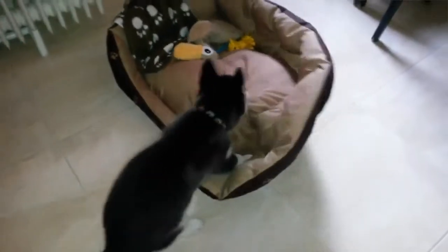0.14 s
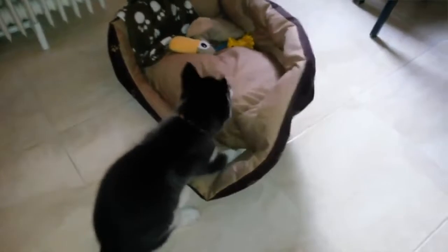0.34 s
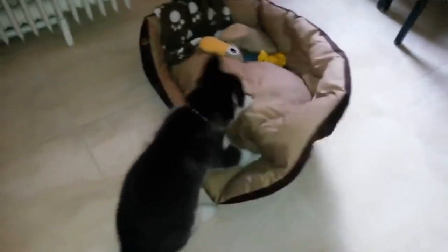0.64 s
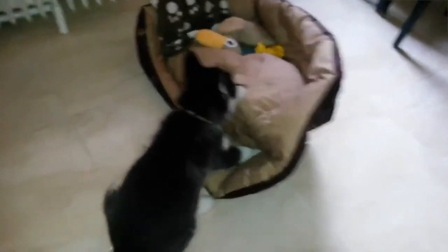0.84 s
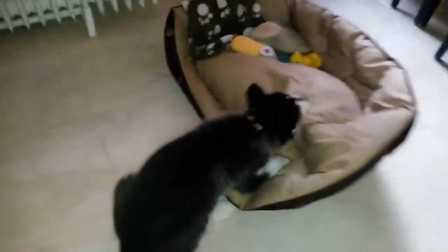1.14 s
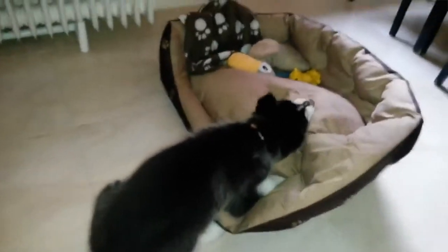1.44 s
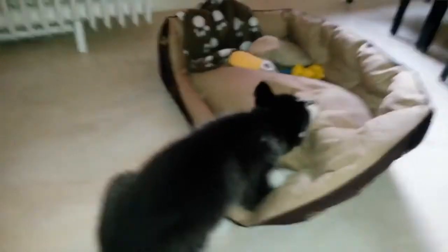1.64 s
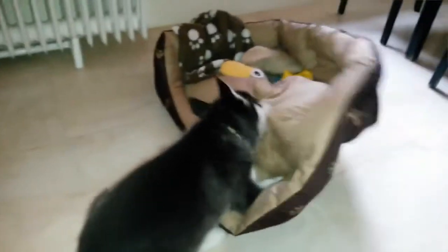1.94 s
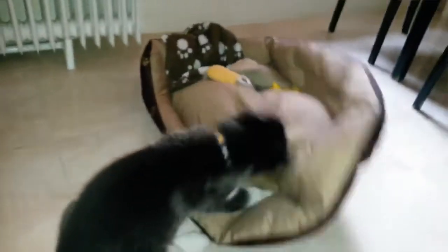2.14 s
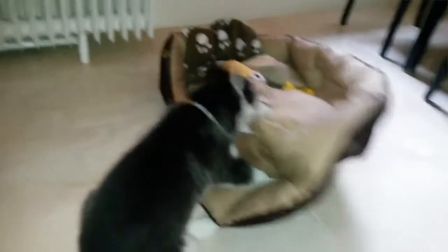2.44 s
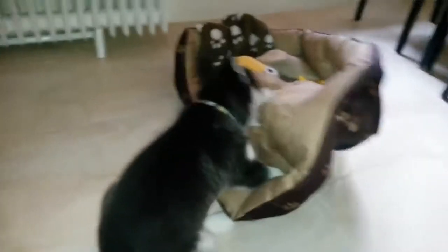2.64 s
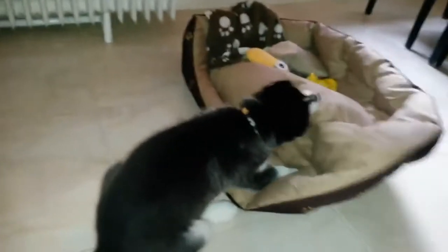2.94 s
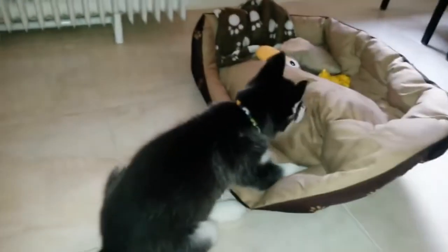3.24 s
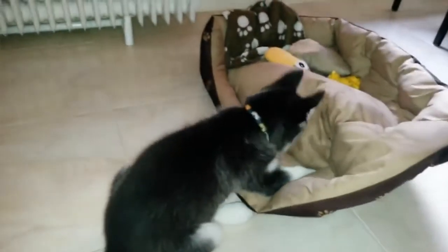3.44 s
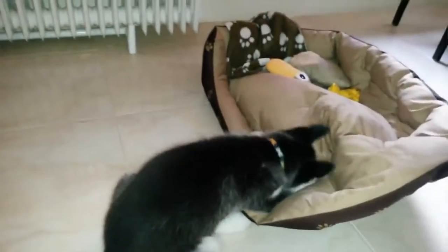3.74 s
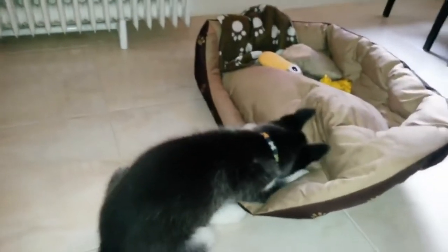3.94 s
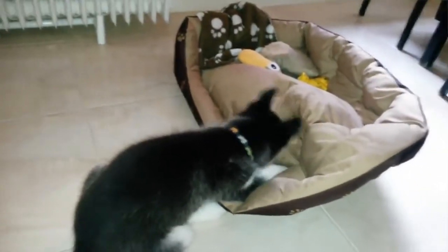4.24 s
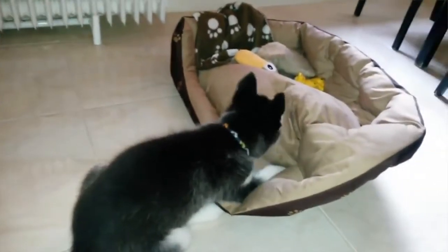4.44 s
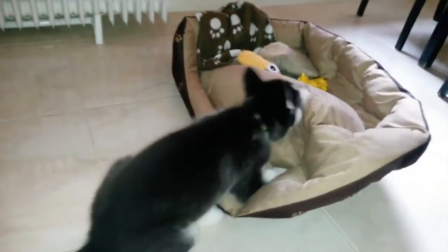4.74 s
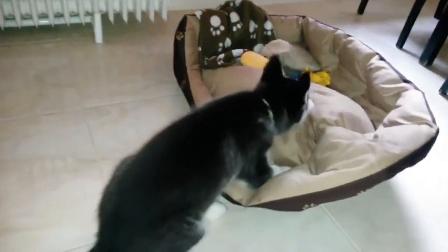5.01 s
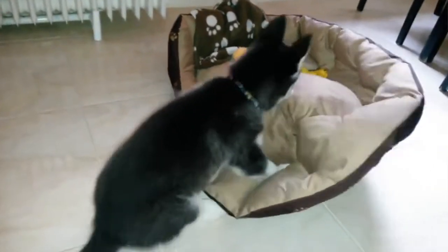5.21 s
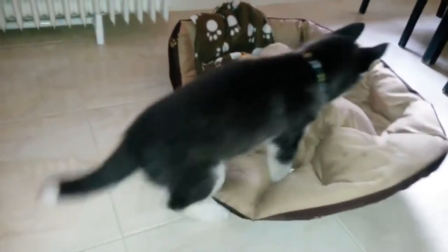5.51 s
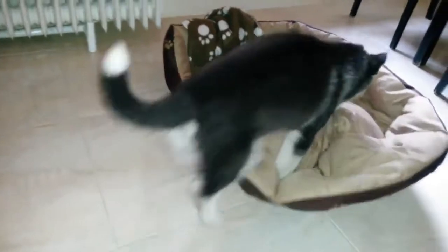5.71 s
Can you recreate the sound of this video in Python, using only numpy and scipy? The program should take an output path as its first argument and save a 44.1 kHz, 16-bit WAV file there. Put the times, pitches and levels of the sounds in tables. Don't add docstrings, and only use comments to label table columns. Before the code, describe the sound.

A puppy digs at a padded bed on tiles in a bare, ringing room, heard by a phone two metres away. Soft rustle opens, then a hard paw knock at 0.2 s with a squeeze of padding. Strokes quicken from 0.5 s, with a softer double knock at 0.6-0.7 s and a strong cloth swish around 1.1 s with a sharp claw snag on the left; a bright clip follows at 1.3 s. From 1.5 to 2.6 s the rustling is looser, with faint bumps. The base judders low at 2.65 s, and the heaviest thump lands at 3.0 s, its echo fading. A small knock at 3.24 s leads into near quiet. At 3.8-4.2 s a muffled, fluttering huff goes into the cushion over low judder, with a small bump at 4.34 s. Pawing returns from 4.8 s, a knock and judder hit at 5.23 s, and bright rustling swells to the end.

```python
import sys
import numpy as np
from scipy import signal
from scipy.fft import rfft, irfft, next_fast_len
from scipy.io import wavfile
from scipy.ndimage import uniform_filter1d

SR = 44100
rng = np.random.default_rng(int(sys.argv[2]) if len(sys.argv) > 2 else 0)


def store_pcm(level_fs):
    pcm = np.round(np.clip(level_fs, -1, 1) * 32767).astype(np.int16)
    wavfile.write(sys.argv[1], SR, np.atleast_2d(pcm).T)


def rack_gain(trim_db):
    fader = np.asarray(trim_db, float)
    return 10 ** (fader / 20)


N = 258862
SIZE = next_fast_len(N + SR)
HZ = np.maximum(np.fft.rfftfreq(SIZE, 1 / SR), 1)
T = np.arange(N) / SR
TICKS = np.arange(0, N / SR, 1 / 1000)


def unit(x):
    return x / np.sqrt(np.mean(x ** 2))


def along(table, column, hz=HZ):
    rows = np.array(table)
    return np.interp(np.log(hz), np.log(rows[:, 0]), rows[:, column])


def curve(table):
    return rack_gain(along(table, 1))


def causal(gain):
    ceps = irfft(np.log(gain + 1e-6), SIZE)
    ceps[1:SIZE // 2] *= 2
    ceps[SIZE // 2 + 1:] = 0
    return np.exp(rfft(ceps))


def ring(hz, width_hz):
    return 1 / (1 + 1j * (HZ - hz * hz / HZ) / width_hz)


def peak(response):
    return response / np.abs(irfft(response, SIZE)).max()


def through(x, response):
    return irfft(rfft(x, SIZE) * response, SIZE)[..., :N]


def pair(source, like):
    mid, side = rfft(source, SIZE)
    like = np.clip(like, 0, 1)
    mid = mid * np.sqrt((1 + like) / 2)
    side = side * np.sqrt((1 - like) / 2)
    return np.array([mid + side, mid - side])


def walk(rate_hz):
    hold = int(SR / rate_hz)
    steps = np.repeat(rng.standard_normal(N // hold + 1), hold)
    return unit(uniform_filter1d(uniform_filter1d(steps, hold), hold)[:N])


def grains(rate_hz, spread_db):
    chance, size, sign = rng.random((3, 2, N))
    size = rack_gain(-spread_db * np.log(size + 1e-4))
    return (chance < rate_hz / SR) * size * np.sign(sign - .5)


def slips(response, rate_hz, spread_db, flicker_db, flicker_hz):
    source = grains(rate_hz, spread_db) * rack_gain(flicker_db * walk(flicker_hz))
    return unit(irfft(pair(source, along(ROOM, 3)) * response, SIZE)[:, :N])


def swells(s, db, swell_s, fade_s, swell_bend=1.3, fade_bend=1.8):
    late_s = TICKS - s[:, None]
    before = (np.maximum(-late_s, 0) / np.c_[swell_s]) ** swell_bend
    after = (np.maximum(late_s, 0) / np.c_[fade_s]) ** fade_bend
    return np.sum(rack_gain(2 * (db[:, None] - 20 * (before + after))), axis=0)


def shudder(db, fade_s):
    hit_s = np.transpose(BLOWS)[0]
    return swells(hit_s + .004, db, [.003], [fade_s], 1, 1)


def level_db(power):
    return np.interp(T, TICKS, 10 * np.log10(power + rack_gain(2 * -95)))


def rubbing():
    sheen_db, rasp_db = strokes()
    scuff_db, judder_db = shoves()
    cloth = rack_gain(sheen_db + 2.5) * sheen(scuff_db - sheen_db)
    cloth = cloth + rack_gain(rasp_db + 1.5) * rasp() + rack_gain(scuff_db + 0.5) * scuff()
    cloth_pan_db = 0.4
    cloth = cloth * rack_gain(np.array([[cloth_pan_db], [-cloth_pan_db]]) / 2)
    return cloth + rack_gain(judder_db - 1.15) * judder() + shake(judder_db)


# peak t/s, level/dB, 20 dB swell/s, 20 dB fade/s, rasp re sheen/dB
STROKES = [(0, -62, .1, .5, -3), (4.3, -71, .17, .12, -5), (.47, -52, .22, .2, -5),
           (.605, -48.5, .08, .2, -6), (.68, -50, .1, .34, -5), (1.004, -48, .06, .2, -6),
           (1.1, -42.5, .16, .12, -7), (5.66, -54, .2, .3, -5), (1.22, -52, .15, .2, -6),
           (1.33, -47.5, .15, .14, -6), (1.63, -56, .22, .45, -6), (1.86, -58, .3, .4, -3),
           (2.11, -51, .3, .4, -8), (2.35, -49.5, .3, .4, -6), (2.63, -52.5, .2, .35, -6),
           (2.98, -55.5, .3, .15, -4), (3.245, -68, .02, .17, -5), (3.67, -76, .2, .3, -9),
           (3.8, -65, .1, .62, -1), (4.83, -58, .12, .45, -6), (5.02, -50, .12, .19, -7),
           (5.25, -50.5, .12, .3, -7), (5.39, -47.5, .2, .3, -6), (5.87, -43.5, .2, .2, -9)]


def strokes():
    s, db, swell_s, fade_s, rasp_db = np.transpose(STROKES)
    knock_db = np.transpose(BLOWS)[1]
    sheen_power = swells(s, db, swell_s, fade_s) + shudder(knock_db - 29.5, .25)
    rasp_power = swells(s, db + rasp_db, swell_s, fade_s) + shudder(knock_db - 25.5, .14)
    return level_db(sheen_power), level_db(rasp_power)


# peak t/s, level/dB, 20 dB swell/s, 20 dB fade/s, scuff re judder/dB
SHOVES = [(0, -57, .1, .25, -4), (.38, -56, .3, .13, -6), (.53, -60, .1, .2, 1), (.95, -63, .25, .17, -4),
          (1.154, -58, .03, .1, -4), (1.262, -56, .15, .2, -6), (1.35, -55, .15, .17, -1),
          (1.67, -60, .14, .3, -2), (1.86, -66, .3, .3, 5), (2.07, -59, .3, .4, 0), (2.33, -56, .2, .4, -1),
          (2.652, -41, .012, .07, -13), (2.71, -45, .04, .09, -12), (2.84, -62, .1, .17, -8),
          (2.96, -70, .15, .15, 6), (3.794, -68, .05, .55, 11), (4.0, -49, .15, .2, -14),
          (4.135, -50, .05, .08, -11), (4.345, -51, .01, .08, -20), (4.86, -64, .08, .6, 0),
          (4.95, -46, .1, .12, -20), (5.235, -40, .012, .05, -20), (5.42, -58.5, .3, .25, -2),
          (5.76, -61, .3, .9, 2)]
# peak t/s, level/dB, 20 dB swell/s, 20 dB fade/s
SCUFFS = [(.01, -56, .05, .05), (.2, -42, .01, .08), (.3, -58, .12, .15), (.5, -64, .15, .15),
          (.72, -54, .1, .13), (1.18, -65, .1, .12), (1.57, -69, .1, .1), (1.84, -58, .1, .13),
          (2.17, -62, .2, .15), (2.55, -63, .2, .2), (2.655, -52, .02, .1), (2.82, -64, .15, .2),
          (3.03, -41, .03, .17), (3.25, -56, .02, .11), (3.66, -83, .12, .2), (4.3, -70, .1, .1),
          (4.78, -76, .08, .1), (5.1, -61, .2, .2), (5.35, -62, .15, .15), (5.53, -63, .15, .15)]


def shoves():
    s, db, swell_s, fade_s, scuff_db = np.transpose(SHOVES)
    _, knock_db, thud_db, _, _ = np.transpose(BLOWS)
    scuff_power = swells(s, db + scuff_db, swell_s, fade_s) + swells(*np.transpose(SCUFFS))
    scuff_power = scuff_power + shudder(knock_db - 20.5, .12)
    judder_power = swells(s, db, swell_s, fade_s) + shudder(thud_db - 14, .15)
    return level_db(scuff_power), level_db(judder_power)


# f/Hz, density/dB per Hz
SHEEN = [(2650, -20), (4500, -9.5), (5650, -6), (6370, -3.5), (7090, 1.5), (7480, 2.5), (8600, -4),
         (13000, -19), (14300, -34.5)]


def sheen(scuff_re_sheen_db):
    upper = np.clip(np.log2(HZ / 8500) / 1.4, 0, 1)
    dulling = rack_gain(-1.2 * np.maximum(scuff_re_sheen_db + 0.5, 0))
    fine = dulling * slips(curve(SHEEN) * upper, 14000, 1.2, 1.3, 20)
    return slips(curve(SHEEN) * (1 - upper), 14000, 0.91, .8, 30) + rack_gain(-11.5) * fine


# f/Hz, density/dB per Hz
RASP = [(1100, -28), (2200, -0.5), (2900, 0), (3700, -1), (5000, -3.5), (7000, -19)]


def rasp():
    return slips(curve(RASP), 8000, 1.9, 0.93, 30)


# f/Hz, density/dB per Hz
SCUFF = [(250, -32), (480, -1.5), (800, -1), (1200, -4.5), (1700, -4), (2200, -9.5), (3500, -35)]


def scuff():
    return slips(causal(curve(SCUFF)), 1500, 0.61, 2.06, 25)


# f/Hz, width/Hz, level/dB
BASE = [(160.2, 30.7, 0), (206, 34.6, 0.5), (253.3, 65, -1.5), (327, 74.4, -2.5), (417, 82, -6.5)]


def judder():
    rings = sum((-1) ** k * rack_gain(db) * ring(hz, width_hz) for k, (hz, width_hz, db) in enumerate(BASE))
    cubed = (HZ / 130) ** 3
    steep = cubed / (1 + cubed)
    return slips(rings * steep, 420, 1.6, 1.9, 22)


# f/Hz, density/dB per Hz
RUMBLE = [(18, -33), (35, -22), (55, -3.5), (75, -8), (95, -9.5), (130, -8), (200, -33)]
RUMBLE_DB = -75


def shake(judder_db):
    rumble = slips(curve(RUMBLE), 200, 1.2, 2.4, 5)
    return rack_gain(RUMBLE_DB + 1.5 + 0.44 * (judder_db + 62.5)) * rumble


def place(s, db, pan_db, room_db):
    out = np.zeros((3, N))
    at = ((s + .0005) * SR).astype(int)
    out[:, at] = rack_gain(db + np.array([pan_db / 2, -pan_db / 2, room_db]))
    return out


# t/s, knock/dB, thud/dB, tick/dB, room/dB
BLOWS = [(0.167, -32.5, -32, -35, -4), (0.19, -16.5, -27, -27, -1.5), (0.601, -27, -29.5, -30, -6.5),
         (0.6644, -32, -32, -49, 7), (0.6831, -34, -44, -48, 1.5), (1.652, -55, -48.5, -45, -5.5),
         (2.0776, -54, -41, -42.5, -6), (2.109, -51, -46, -54.5, 14), (2.3165, -39, -40.5, -56.5, 3.5),
         (2.6467, -47, -34, -52, 4), (2.693, -41, -39, -47, 5), (3.0003, -16.5, -18, -33, 0),
         (3.2375, -40, -36, -45, -7), (4.34, -37, -44, -48, -1), (5.229, -30, -27.5, -46, -2.5),
         (5.28, -49, -67, -56, -5)]
# f/Hz, density/dB per Hz
THUD = [(24, -55), (40, -21.5), (173, 3.5), (363, 7), (497, 7), (624, 4.5), (903, -18.5), (1030, -17.5),
        (1200, -3), (1560, -30), (2640, -120)]
# f/Hz, density/dB per Hz
KNOCK = [(400, -19), (800, 1.5), (1500, 3), (2400, 3), (3500, -9.5), (5000, -17), (7000, -24.5),
         (12000, -72)]


def blows():
    s, knock_db, thud_db, tick_db, room_db = np.transpose(BLOWS)
    pan_db = np.full(len(s), -4.5)
    thud_body = causal(curve(THUD)) * (1 + 0.92 * ring(215, 60))
    thud = through(place(s, thud_db - 1.0, 0.27 * pan_db, room_db - 3), peak(thud_body))
    knock = through(place(s, knock_db - 5.0, pan_db, room_db), peak(causal(curve(KNOCK))))
    tick = through(place(s, tick_db + .4, pan_db, room_db + 2), peak(ring(7500, 2800) ** 3))
    boom = through(place(s, thud_db - 32, .1 * pan_db, room_db - 60.5), peak(ring(56, 9)))
    return thud + knock + tick + boom


# t/s, level/dB, f/Hz, left minus right/dB, room/dB
SNAGS = [
    (1.1034, -24.5, 3000, 13.5, -1),
    (1.3284, -35, 7660, 4.0, -7),
    (1.5219, -53, 1490, 0, -13.5),
    (1.8188, -43.5, 7240, 5.0, -10),
    (3.5882, -64, 2680, -6.5, -10.5),
    (3.6586, -62, 6940, 6.5, -13.5),
    (4.1275, -46.5, 7200, 14, -13),
    (4.9781, -39.5, 7550, 3.5, -5),
]


def snags():
    out = np.zeros((3, N + 400))
    t = np.arange(400) / SR
    for s, db, hz, pan_db, room_db in SNAGS:
        lower = np.clip((db + 35) / 15, .05, 1)
        tone = np.sin(2 * np.pi * hz * t) + lower * np.sin(2 * np.pi * 0.6 * hz * t)
        click = t ** 2 * np.exp(-t / 0.00026) * tone
        gain = rack_gain(db + 1 + np.array([[pan_db / 2], [-pan_db / 2], [room_db]]))
        start = int(s * SR)
        out[:, start:start + len(t)] += gain * click / np.abs(click).max()
    return out[:, :N]


# t/s, level/dB, muzzle resonance f/Hz
HUFF = [
    (3.74, -79, 490),
    (3.804, -62, 471),
    (3.872, -54.5, 348),
    (3.996, -46.5, 370),
    (4.026, -45, 350),
    (4.038, -43, 354),
    (4.08, -49.5, 344),
    (4.128, -45.5, 340),
    (4.27, -73.5, 365),
]


def huff():
    s, db, hz = np.transpose(HUFF)
    centres_hz = np.array([255, 354, 438, 605, 753])
    puffs = pair(grains(600, 1.4), along(ROOM, 3))
    cover_db = -5 * np.abs(np.log2(centres_hz[:, None] / np.interp(T, s, hz)))
    voice = 0
    for k, (centre_hz, ring_db) in enumerate(zip(centres_hz, cover_db)):
        rung = irfft(puffs * ring(centre_hz, 0.18 * centre_hz), SIZE)[:, :N]
        voice = voice + (-1) ** k * rack_gain(ring_db) * rung
    return unit(voice) * rack_gain(np.interp(T, s, db + .3, left=-200, right=-200))


# f/Hz, ring time/s, echo level/dB, left-right likeness 0-1, left minus right/dB
ROOM = [(60, 0.8, 4.5, .9, -3.5), (128.6, 0.57, -2, 0.92, 1), (250, 0.52, 0.5, 0.94, -1.1),
        (468, 0.61, -3.5, 0.8, -1), (1020, 0.4, -2.5, 0.49, -0.5), (2050, .55, -1.5, .05, -4.5),
        (4000, 0.45, -3.5, 0, -1.5), (7540, 0.71, -0.5, 0, 3.5), (13500, 1, -17, 0, -7.5)]


def echoes(gap_s, early_db, early_share):
    noise = pair(rng.standard_normal((2, SR)), along(ROOM, 3))
    t = np.arange(SIZE) / SR
    tail = 0
    for k, (_, t60_s, db, _, _) in enumerate(ROOM):
        share = np.interp(np.log(HZ), np.log(np.array(ROOM)[:, 0]), np.eye(len(ROOM))[k])
        late = np.exp(-np.log(1000) * t / t60_s)
        early = rack_gain(early_db) * late ** (1 / early_share)
        fade = (late + early) * np.clip(t / gap_s - 1, 0, 1) * (t < 1)
        tail = tail + rack_gain(db) * irfft(noise * share, SIZE) * fade / np.sqrt(np.sum(fade ** 2))
    return rfft(tail)


# f/Hz, density/dB per Hz
HUSH = [(15, -26.5), (25, -3), (127, -5.5), (240, -10.5), (358, -22), (679, -23.5), (934, -14), (5270, -21),
        (7260, -19), (13400, -24.5), (14500, -22)]
HUSH_DB = -78


def hush():
    noise = pair(rng.standard_normal((2, N)), .4 * along(ROOM, 3))
    return rack_gain(HUSH_DB - 1.5) * unit(irfft(noise * curve(HUSH), SIZE)[:, :N])


def scene():
    hits = blows() + snags()
    walls = rack_gain(3.5) * through(hits[2], echoes(gap_s=0.0013, early_db=2.2, early_share=0.18))
    return rubbing() + hits[:2] + walls + huff() + hush()


def top_cut(x):
    return signal.sosfilt(signal.butter(12, 14760, fs=SR, output="sos"), x)


def record(dry):
    tilt_db = along(ROOM, 4)
    ports = rack_gain(np.array([tilt_db, -tilt_db]) / 2) * (HZ < 14560)
    mix = through(dry, ports)
    return top_cut(mix)


dry = scene()
out = record(dry)
store_pcm(out)
```